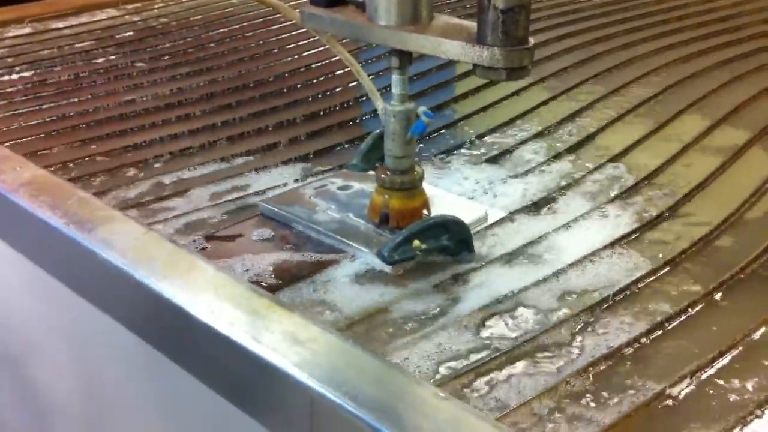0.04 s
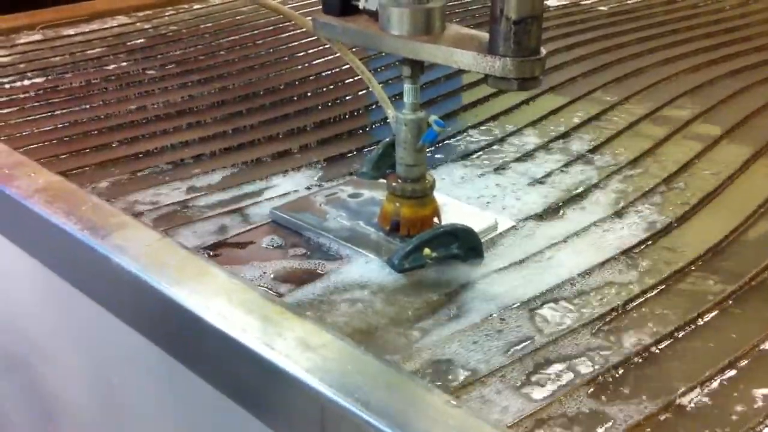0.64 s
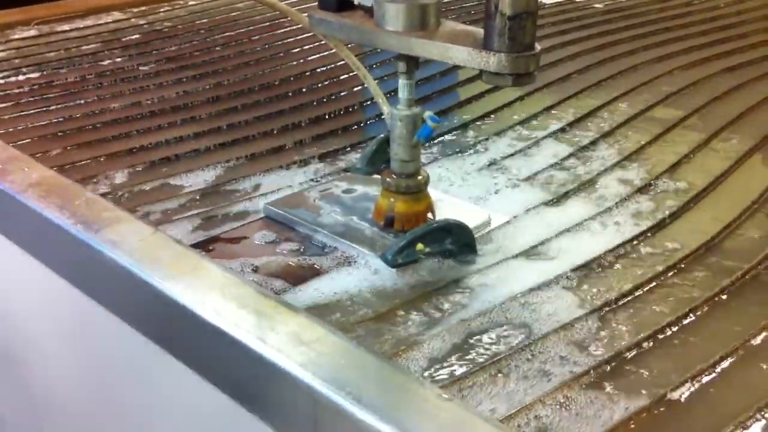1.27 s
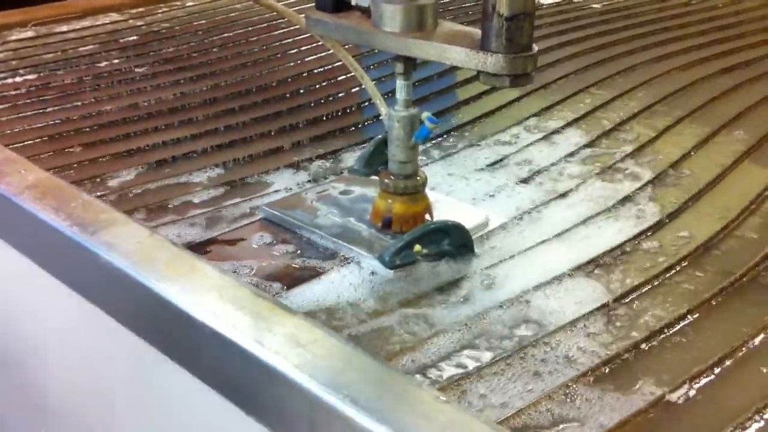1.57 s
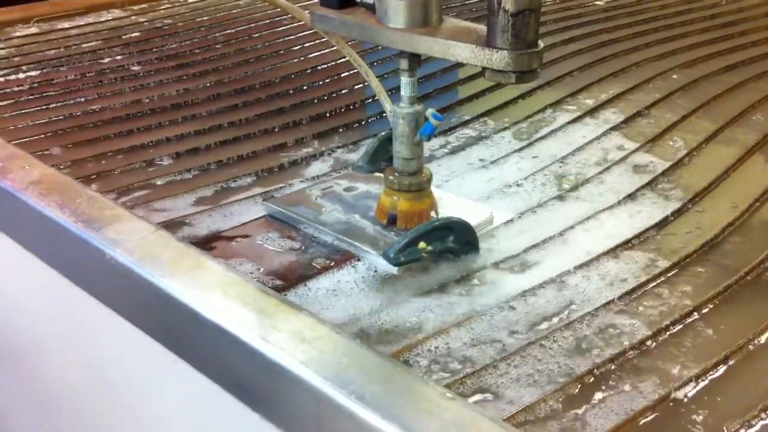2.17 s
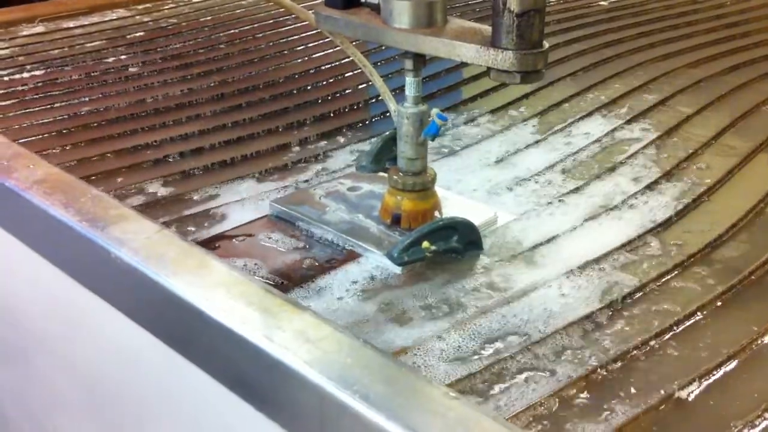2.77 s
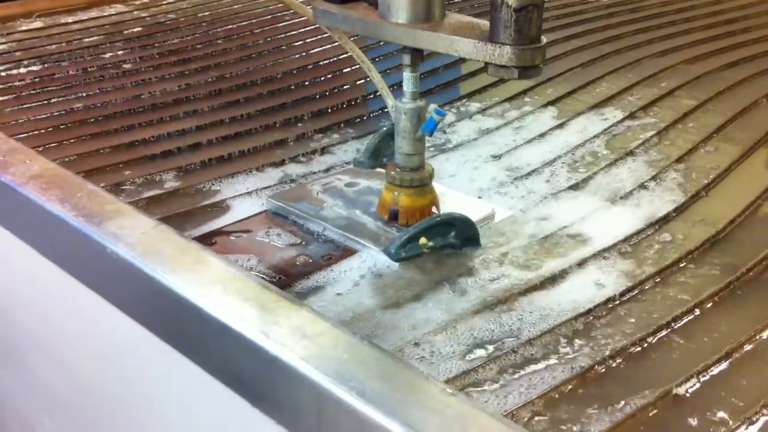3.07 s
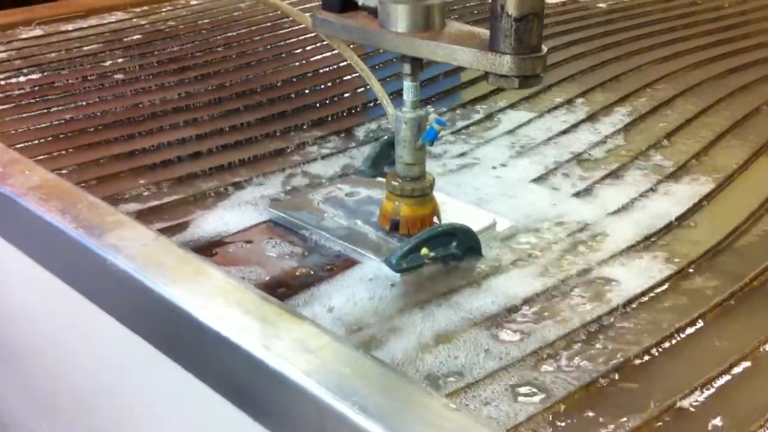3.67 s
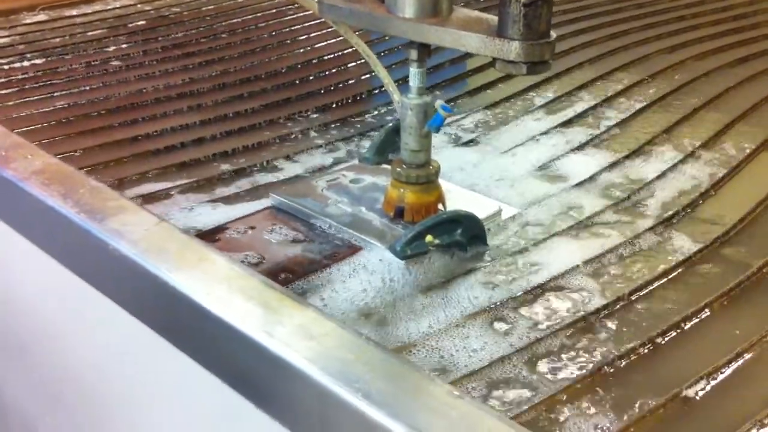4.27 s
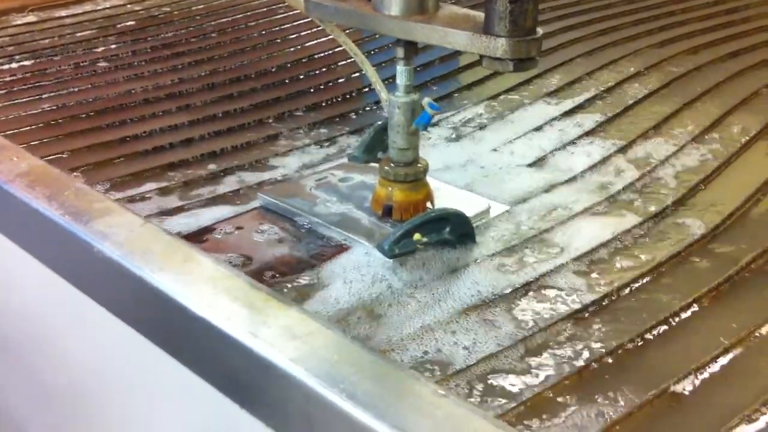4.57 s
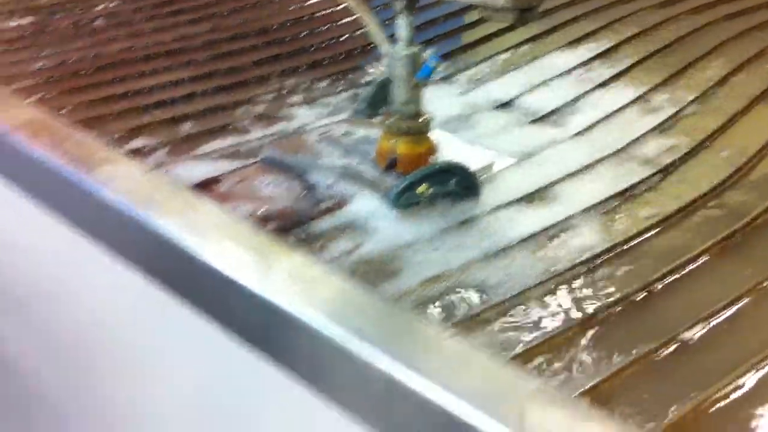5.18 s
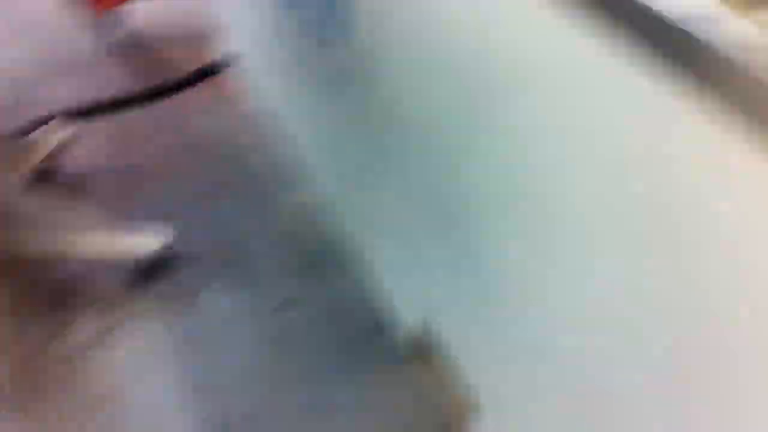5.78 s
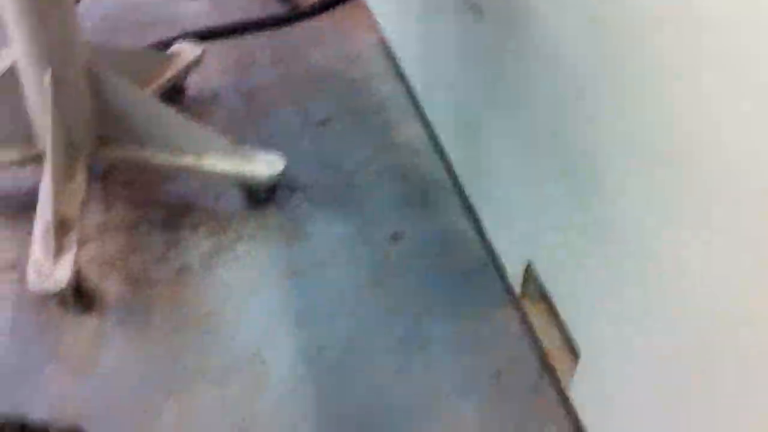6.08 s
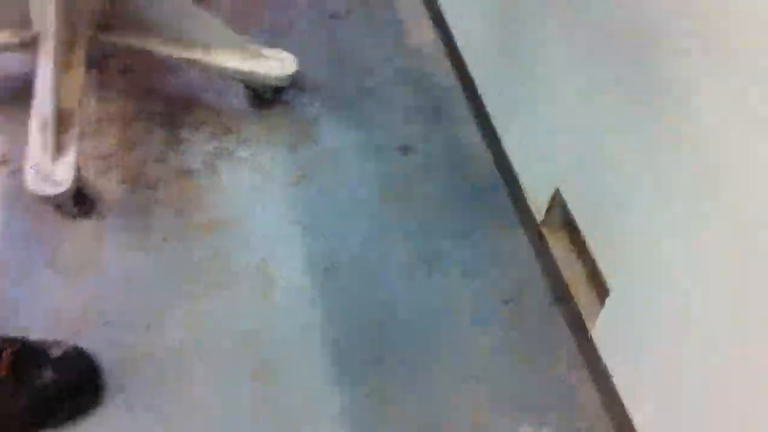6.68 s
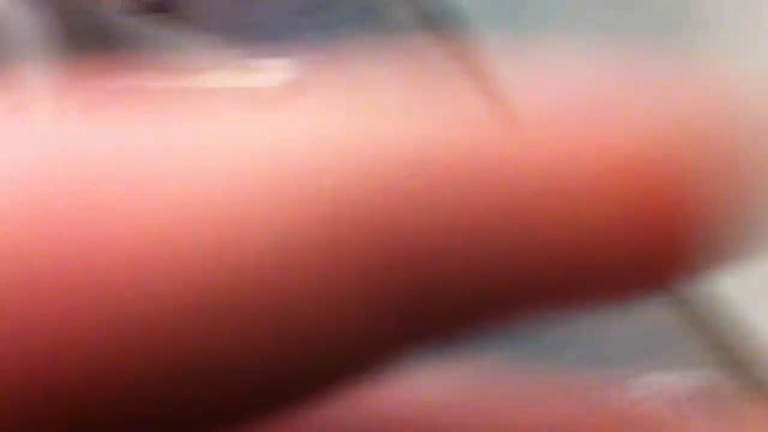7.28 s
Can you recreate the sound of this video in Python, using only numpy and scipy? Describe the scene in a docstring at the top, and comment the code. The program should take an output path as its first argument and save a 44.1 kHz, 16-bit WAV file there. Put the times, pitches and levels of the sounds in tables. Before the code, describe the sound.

In a workshop, a waterjet cuts sheet metal with a loud, high, fluttering hiss over churning water and a humming pump. About halfway through the jet shuts off and fades in the room. The pump drones on, its whining overtones shifting as the microphone moves. Near the end the jet reopens with a lower roar, which turns hollow as a hand cups the microphone.

```python
"""Waterjet in a workshop

At the cutting table a jet tears through sheet metal with a loud, fluttering hiss, over the hum of a
nine-piston pump. The jet shuts off and rings out in the room; the pump hums on while the microphone
is carried through its standing waves. Near the end the jet reopens with a lower roar and a hand
cups the microphone."""
import sys
import numpy as np
from scipy import signal
from scipy.fft import rfft, irfft
from scipy.io import wavfile
from scipy.ndimage import uniform_filter1d

SR = 44100
rng = np.random.default_rng(int(sys.argv[2]) if len(sys.argv) > 2 else 0)


def wrap_up_sound(samples):
    """Save the sound to the file named by the first command line argument, as 16-bit audio."""
    columns = np.atleast_2d(samples).T
    # keep every value between -1 and 1, then stretch to whole-number steps
    tamed = np.clip(columns, -1, 1)
    steps = np.round(tamed * 32767).astype(np.int16)
    wavfile.write(sys.argv[1], SR, steps)


N = 332514
TIME, FRAME_S = np.arange(N) / SR, np.arange(N // 256 + 5) * 256 / SR
BIN_HZ, FINE_HZ = np.fft.rfftfreq(1024, 1 / SR), np.fft.rfftfreq(N, 1 / SR)
SHUT_S, OPEN_S = 3.38, 7.117  # the jet's valve
PISTONS, ROTOR_SLOTS = 9, 44


# The jet at the microphone, relative levels: (time [s], roar [dB], hiss [dB], sizzle [dB])
JET_LEVELS = [(0.0, -28, -25.5, -17), (0.1, -29.5, -25.5, -19), (0.34, -29, -28.5, -17.5),
              (1.14, -31, -27, -19), (2.21, -30.5, -25.5, -16), (2.38, -31, -28.5, -18),
              (2.86, -29.5, -25, -24), (2.95, -28.5, -25.5, -17.5), (2.97, -32, -24, -22.5),
              (3.36, -27, -24.5, -21)]
# Spectrum of the jet at the cut: (frequency [Hz], relative level [dB])
JET_SPECTRUM = [(900, -36), (1500, -11.5), (2000, -9), (2350, -12.5), (2700, -11), (3600, -14), (5200, -13),
                (5900, -11.5), (7100, 0), (8300, -0.5), (9200, 0.5), (11000, 1.5), (12300, 3.5),
                (14000, 1.5), (15800, 0)]
# Resonances of the sheet and the slats under it: (frequency [Hz], width [Hz], lift [dB])
SHEET_MODES = [(2100, 230, 2.5), (2573, 94, 7), (3140, 85, 1.5), (3820, 120, 2.5), (6230, 320, 2),
               (12250, 500, 0.5)]

def cutting_jet():
    """The jet tears through the kerf, fluttering and surging as abrasive and spray come unevenly."""
    roar_db, hiss_db, sizzle_db = follow(JET_LEVELS)
    resonance_db = kerf_colour() + lift(SHEET_MODES, BIN_HZ)
    noise = turbulence(JET_SPECTRUM, eddy_db=1.2, ripple_db=2.0, extra_db=resonance_db)
    flutter = wander(rate_hz=57.3, slowest_hz=15)
    surge = wander(rate_hz=9.2, slowest_hz=3.8)
    flicker = wander(rate_hz=15, slowest_hz=6.6)
    roar = band(noise, 1550, 5990) * gain_of(roar_db + 0.5 * flutter + 0.12 * surge)
    hiss_db = hiss_db + 0.22 * flutter + 0.5 * surge + 0.75 * flicker - 1.05
    hiss = band(noise, 6260, 8540) * gain_of(hiss_db)
    sizzle = band(noise, 8930, 15000) * gain_of(sizzle_db + 0.98 * flutter + 0.96 * surge)
    # the direct sound stops quickly; the room's share lingers, the treble least
    direct = (roar + hiss + sizzle) * ring_out(t60=0.12)
    room = roar * ring_out(t60=1.0) + hiss * ring_out(t60=0.84) + sizzle * ring_out(t60=0.49)
    return 0.52 * direct + 0.57 * room


# Stretches of the cut: (start [s], hollow tone [Hz], tone gain [dB], dip gain [dB], fizz gain [dB])
KERF_STRETCHES = [(0, 9630, 5, -1, 1.5), (.93, 7800, -2, -7, 1), (1.65, 9040, 6, 2, -5),
                  (2.35, 7900, -1, 2, 1.5), (2.62, 7900, 4.5, -12, 7.5)]

def kerf_colour():
    """The slot under the jet rings hollow and cancels just above that tone: dB by frame and bin."""
    colours = []
    for _, hz, tone_db, dip_db, fizz_db in KERF_STRETCHES:
        modes = [(hz, 230, tone_db), (hz * 1.072, 330, dip_db), (15200, 2700, fizz_db)]
        colours.append(lift(modes, BIN_HZ))
    stretch = np.searchsorted([row[0] for row in KERF_STRETCHES[1:]], FRAME_S)
    return uniform_filter1d(np.array(colours)[stretch], size=9, axis=0)


# Spectrum of the reopened jet: (frequency [Hz], relative level [dB])
BLAST_SPECTRUM = [(30, -42), (100, -34), (135, -33), (175, -2), (330, -3.5), (600, 3.5), (1000, -5.5),
                  (1350, -4.5), (2000, -12), (3300, -10), (4000, -14.5), (6000, -16.5), (9000, -18),
                  (12500, -19), (15800, -21)]
# Hollow of the hand, right at the microphone: (frequency [Hz], width [Hz], lift [dB])
HAND_MODES = [(2730, 510, 11.5), (4660, 140, 18.5), (5550, 170, 16), (7520, 250, 13), (9100, 260, 8),
              (10600, 230, 3.5), (11300, 220, 2), (12250, 240, 2.5)]

def reopening_jet(attack_s=0.037, cup_s=7.15, closing_s=0.2, thump_t60=0.17):
    """The valve opens with a thump and a rush of spray; a hand closes round the microphone and rings."""
    age = np.maximum(TIME - OPEN_S, 0)
    noise = turbulence(BLAST_SPECTRUM, eddy_db=0.4, ripple_db=3.0)
    cupped = np.clip((TIME - cup_s) / closing_s, 0, 1)
    hollow = irfft(rfft(noise) * gain_of(lift(HAND_MODES, FINE_HZ)), N)
    rush = band(noise, 20, 2300) * gain_of(-20 - 22 * age)
    spray = (1 - cupped) * band(noise, 2300, 16500) + cupped * band(hollow, 1720, 16500)
    spray *= gain_of(-24 - 7 * age)
    thump = band(rng.standard_normal(N), 20, 220) * gain_of(-37 - 60 * age / thump_t60)
    return (rush + spray + thump) * np.minimum(age / attack_s, 1)


# The pump's stroke rate, a little lower under load: (time [s], rate [Hz])
STROKE_RATE = [(0, 268.2), (3.35, 268.5), (3.6, 269.5), (7.1, 269.55), (7.54, 268.3)]
# The motor's slot whistle at the microphone: (time [s], level [dB])
WHISTLE_LEVEL = [(3.3, -45), (3.5, -42), (5.8, -42.5), (6.6, -39.5), (6.9, -47.5)]

def pump():
    """Pistons, shaft and the motor's singing rotor slots share one speed, which wavers under load."""
    stroke_hz, = follow(STROKE_RATE)
    loaded = 1 - during(SHUT_S, OPEN_S, TIME)
    waver_hz = (0.089 + 0.824 * loaded) * wander(rate_hz=9.2)
    angle = 2 * np.pi * np.cumsum(stroke_hz + waver_hz) / SR
    whistle_db = follow(WHISTLE_LEVEL)[0] + (0.77 + 4.3 * loaded) * wander(rate_hz=11)
    whistle = gain_of(whistle_db) * np.sin(ROTOR_SLOTS * angle / PISTONS)
    return np.sqrt(2) * (piston_tones(angle, loaded) + shaft_tones(angle / PISTONS) + whistle)


# Stroke tone, octave and third harmonic along the microphone's path: (time [s], base level [dB])
HUM_LEVEL = [(0.0, -26.5), (0.2, -26), (0.49, -32), (0.83, -28.5), (1.01, -35), (1.5, -27), (1.74, -35.5),
             (1.98, -27.5), (2.25, -37), (2.83, -23.5), (3.0, -31.5), (3.28, -24), (3.54, -27), (5.34, -26),
             (6.43, -23), (7.1, -23)]
OCTAVE_LEVEL = [(0.0, -50.5), (0.22, -31), (0.39, -34), (0.47, -26), (0.63, -48), (0.73, -29),
                (1.18, -27.5), (1.38, -40), (1.48, -31.5), (1.84, -41), (2.19, -24), (2.41, -24),
                (2.67, -41.5), (3.06, -26), (3.12, -39), (3.54, -23), (3.76, -19.5), (4.27, -24),
                (5.52, -25), (6.05, -32.5), (6.62, -24), (7.1, -21.5)]
THIRD_LEVEL = [(0.0, -45), (0.41, -47), (0.43, -33.5), (1.52, -50), (1.72, -33.5), (2.81, -49), (3.04, -31),
               (4.01, -54.5), (5.54, -42.5), (6.07, -34), (6.84, -38), (7.1, -33)]
# The four whining upper tones: (harmonic [number])
WHINE_ORDERS = [4, 10, 14, 18]
# Those tones along the same path: (time [s], base level of each of the four [dB])
WHINE_LEVELS = [(3.55, -44, -50, -61, -65), (3.75, -53, -42.5, -59, -53), (4.13, -43.5, -45.5, -53, -44),
                (5.09, -46, -36.5, -59, -51.5), (5.51, -41, -40.5, -45, -40.5),
                (5.71, -42, -42, -67, -43.5), (5.79, -40, -39.5, -42, -49), (6.1, -55, -46.5, -65, -48),
                (6.28, -39, -51, -45, -63), (6.43, -40, -40, -51, -59), (6.66, -42, -51, -41.5, -44),
                (6.72, -42, -37.5, -49, -59), (7.02, -41, -39.5, -41, -42), (7.1, -41, -45, -48, -48)]
# The weaker pump harmonics: (frequency [Hz], base level [dB])
BUZZ_SPECTRUM = [(1350, -54), (1615, -52), (1890, -63), (2150, -53), (2430, -57), (3230, -55.5),
                 (3500, -55.5), (4050, -76), (4600, -62), (5100, -55), (5900, -64.5), (6450, -62.5),
                 (7600, -66), (11000, -79)]
# The microphone crosses the crest of a thin whine: (time [s], length [s], harmonic [number])
CRESTS = [(4.0, .6, 26), (5.45, .4, 22), (6.48, .47, 9)]

def piston_tones(angle, loaded, walk_s=4.77, standing_db=4.5, crest_db=11):
    """Each stroke pushes oil: a buzz whose harmonics swell and fade in the room's standing waves."""
    curves = follow(HUM_LEVEL) + follow(OCTAVE_LEVEL) + follow(THIRD_LEVEL) + follow(WHINE_LEVELS)
    strong_db = dict(zip([1, 2, 3] + WHINE_ORDERS, curves))
    # the waves pass faster once the microphone is carried
    waves_per_s = np.interp(FRAME_S, [walk_s, walk_s + 0.34], [0.253, 1.26])
    walked = np.cumsum(waves_per_s) * FRAME_S[1]
    tones = np.zeros(N)
    for k in range(1, 42):
        phase, place, spacing = rng.random(3)
        if k in strong_db:
            db = strong_db[k]
            if k <= WHINE_ORDERS[0]:  # under load the low overtones waver and drop
                db = db + loaded * (k - 1) * (1.2 * wander(rate_hz=7.4, slowest_hz=3.8) - 1.4)
            db = np.interp(FRAME_S, TIME, db)
        else:
            standing_wave = np.sin(2 * np.pi * (place + (0.5 + spacing) * walked))
            db = read(BUZZ_SPECTRUM, k * STROKE_RATE[0][1]) + standing_db * standing_wave
            for at, length, harmonic in CRESTS:
                if harmonic == k:
                    db += crest_db * during(at - length / 2, at + length / 2, FRAME_S, fade_s=0.2)
        # the hum recedes as the jet reopens, lowest tone first
        db -= 11.5 * np.clip((FRAME_S - OPEN_S) / (k * 0.12), 0, 1)
        tones += np.interp(TIME, FRAME_S, gain_of(db)) * np.sin(k * angle + 2 * np.pi * phase)
    return tones


# Side tones at multiples of the pump's shaft speed: (frequency [Hz], mean level [dB])
SHAFT_SPECTRUM = [(30, -77), (90, -86), (120, -61.5), (150, -66), (210, -64.5), (330, -59.5), (560, -64),
                  (700, -65), (1000, -65), (1300, -70.5), (1650, -64.5), (2600, -107)]

def shaft_tones(shaft_angle):
    """Unequal pistons repeat one small pattern every turn: weak tones between the stroke harmonics."""
    orders = np.arange(1, 88)
    shaft_hz = STROKE_RATE[0][1] / PISTONS
    order_db = read(SHAFT_SPECTRUM, orders * shaft_hz) + 1.6 * rng.standard_normal(len(orders))
    phasors = gain_of(order_db) * (orders % PISTONS > 0) * np.exp(2j * np.pi * rng.random(len(orders)))
    turn = np.linspace(0, 2 * np.pi, 2048)
    pattern = (phasors @ np.exp(1j * np.outer(orders, turn))).real
    return np.interp(shaft_angle % (2 * np.pi), turn, pattern)


# Water churning in the tank below the cut: (time [s], relative level [dB])
CHURN_LEVEL = [(0.0, -42), (0.04, -47), (0.32, -38.5), (0.56, -43), (2.2, -40), (3.36, -39.5)]
# Spectrum of that water: (frequency [Hz], relative level [dB])
CHURN_SPECTRUM = [(40, -49), (100, -30), (180, -9), (300, 2.5), (450, -2), (700, 0), (1000, -3.5),
                  (1400, -4), (1900, -12), (3000, -30)]

def tank():
    """The spent jet churns the water under the slats."""
    churn_db, = follow(CHURN_LEVEL)
    water = turbulence(CHURN_SPECTRUM, eddy_db=1.0, ripple_db=3.0)
    return water * gain_of(churn_db + 8.5) * ring_out(t60=0.99)


# Room tone of the workshop: (frequency [Hz], relative level [dB])
ROOM_SPECTRUM = [(25, -28), (70, -32), (92, -14), (115, -7.5), (150, -7), (180, 1), (300, 2.5), (600, 4),
                 (900, -2.5), (1300, -7.5), (2400, -7.5), (3700, -7), (5500, -9), (8000, -18),
                 (11000, -17.5), (15800, -29)]

def workshop(mains_hum_hz=120):
    """A steady wash of fans and draining water around the microphone, with a faint electrical hum."""
    mains = gain_of(-60.5 + 2 * wander(rate_hz=4.8)) * np.sin(2 * np.pi * mains_hum_hz * TIME)
    return turbulence(ROOM_SPECTRUM, eddy_db=1.2, ripple_db=2.5) * gain_of(-37.5) + mains


def turbulence(spectrum, eddy_db, ripple_db, extra_db=0):
    """Noise with brief eddies and the narrow, slowly drifting ripple that nearby reflections give."""
    real, imaginary = rng.standard_normal((2, len(FRAME_S), len(BIN_HZ)))
    eddies = eddy_db * patches(frames=7, bins=24)
    ripple = ripple_db * patches(frames=70, bins=2)
    frames = (real + 1j * imaginary) * gain_of(read(spectrum, BIN_HZ) + extra_db + eddies + ripple)
    _, noise = signal.istft(frames.T, nperseg=1024, noverlap=768)
    return unit_rms(noise[:N])


def patches(frames, bins):
    """A smooth random field over time and frequency."""
    field = rng.standard_normal((len(FRAME_S), len(BIN_HZ)))
    return unit_rms(uniform_filter1d(uniform_filter1d(field, frames, axis=0), bins, axis=1))


def wander(rate_hz, slowest_hz=0):
    """Random drift of rms 1, with little above the given rate or below the slowest."""
    weight = FINE_HZ / (FINE_HZ + slowest_hz + 1e-9) / (1 + (FINE_HZ / rate_hz) ** 2)
    return unit_rms(irfft(rfft(rng.standard_normal(N)) * weight, N))


def band(x, lo_hz, hi_hz):
    """One soft-edged band of a sound, at rms 1."""
    rolloff = np.sqrt((1 + (lo_hz / (FINE_HZ + 1)) ** 40) * (1 + (FINE_HZ / hi_hz) ** 40))
    return unit_rms(irfft(rfft(x) / rolloff, N))


def lift(modes, hz):
    """The dB that a set of resonances adds at each frequency."""
    return sum(db / (1 + (2 * (hz - centre) / width) ** 2) for centre, width, db in modes)


def ring_out(t60):
    """Full level until the valve shuts, then a fall of 60 dB every t60 seconds."""
    return gain_of(-60 * np.maximum(TIME - SHUT_S, 0) / t60)


def during(start, end, t, fade_s=0.15):
    """A soft-edged window over a stretch of time."""
    return np.clip(np.minimum(t - start, end - t) / fade_s + 0.5, 0, 1)


def read(spectrum, hz):
    """A spectrum table's dB at given frequencies, on a log-frequency axis."""
    table_hz, db = np.transpose(spectrum)
    return np.interp(np.log(hz + 1), np.log(table_hz + 1), db)


def follow(rows):
    """The columns of a time table, one value per sample."""
    times, *columns = np.transpose(rows)
    return [np.interp(TIME, times, column) for column in columns]


def gain_of(db):
    """Decibels to gain."""
    return 10 ** (np.asarray(db) / 20)


def unit_rms(x):
    """Scales to rms 1."""
    return x / np.sqrt(np.mean(x ** 2) + 1e-20)


def scene():
    """All sources reach one microphone, heard alike on both channels."""
    mono = pump() + cutting_jet() + tank() + reopening_jet() + workshop()
    return np.array([mono, mono])


def record(dry):
    """The recorder cuts off the highest treble."""
    lowpass = signal.firwin(511, 15850, window=("kaiser", 9), fs=SR)
    return signal.oaconvolve(dry, lowpass[None], "same")


dry = scene()
out = record(dry)
wrap_up_sound(out)
```